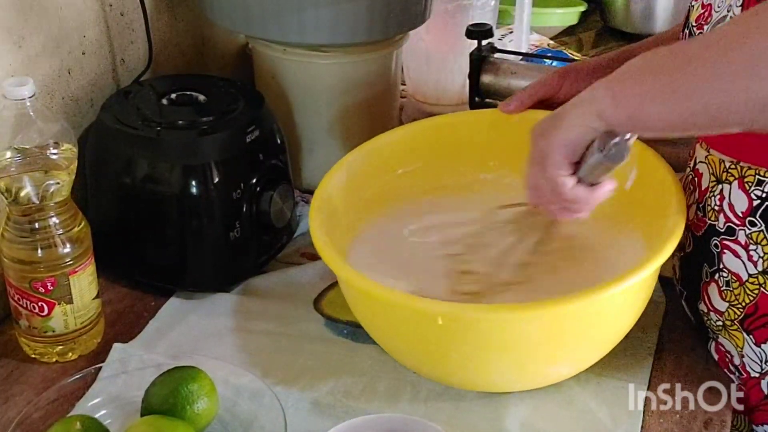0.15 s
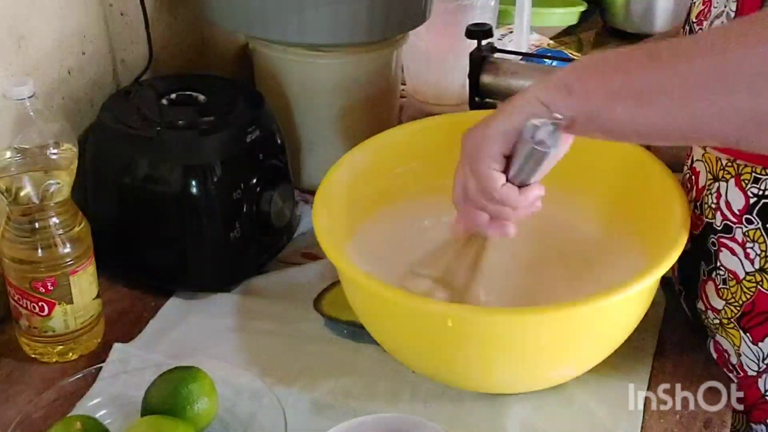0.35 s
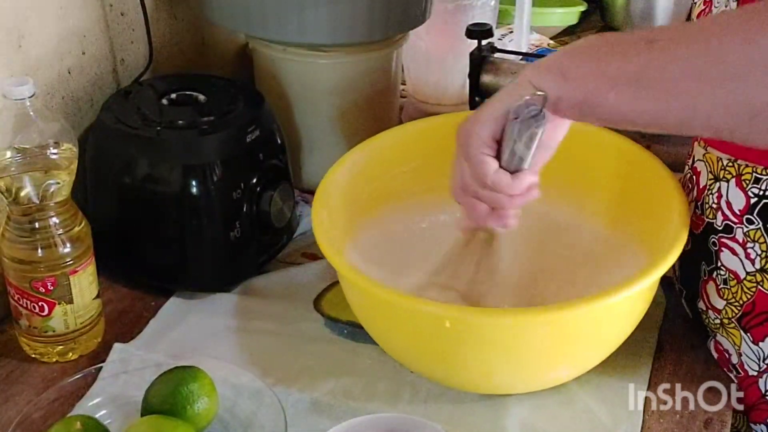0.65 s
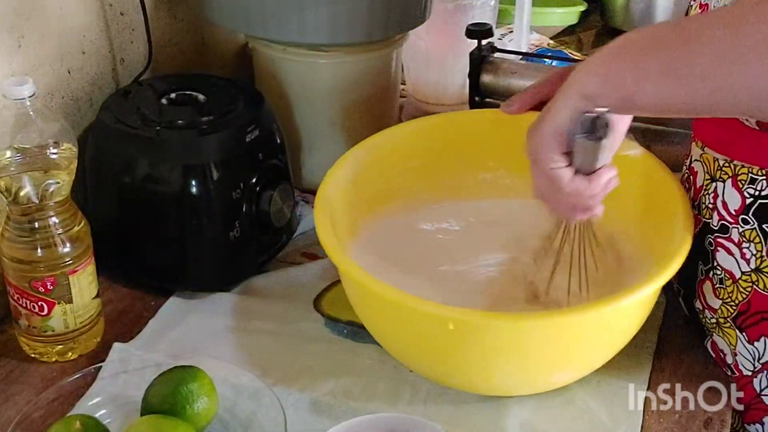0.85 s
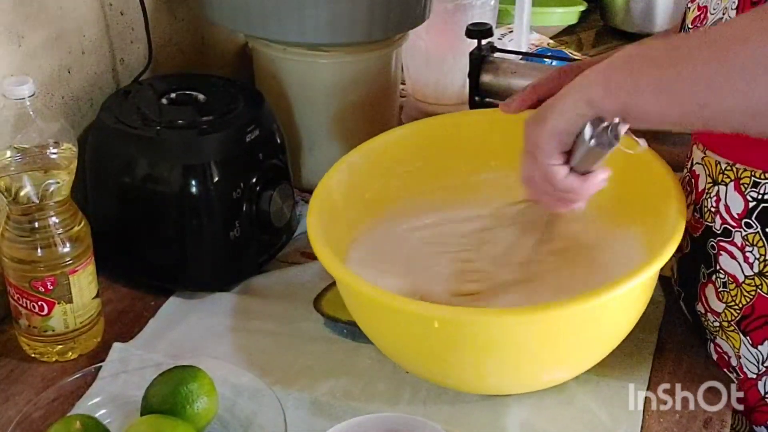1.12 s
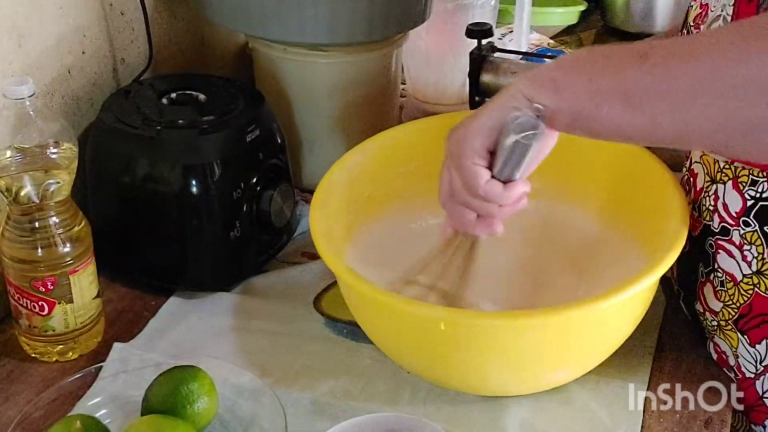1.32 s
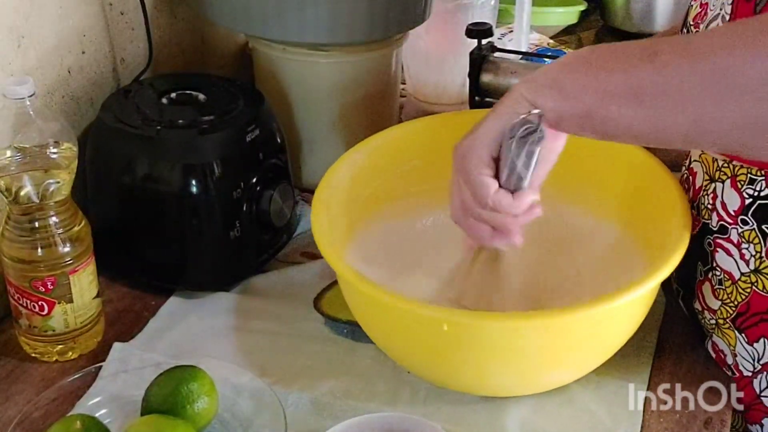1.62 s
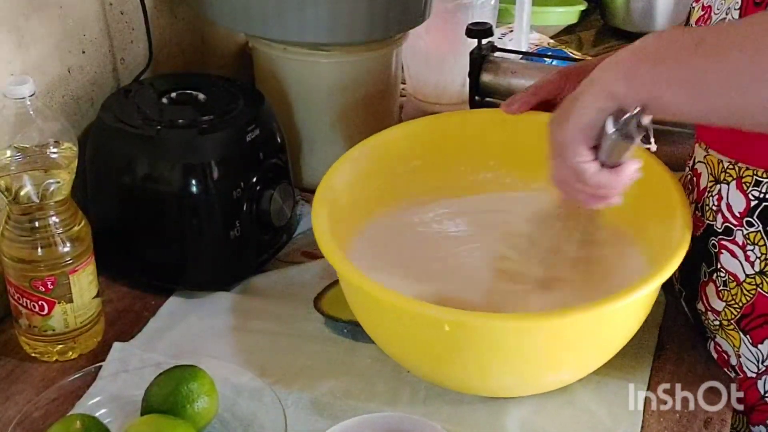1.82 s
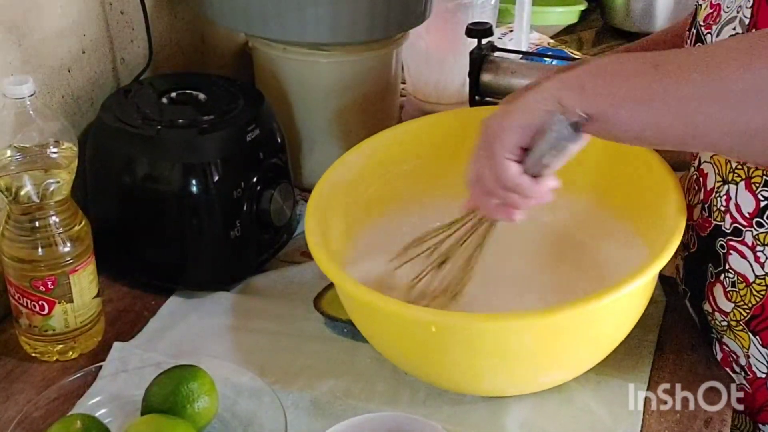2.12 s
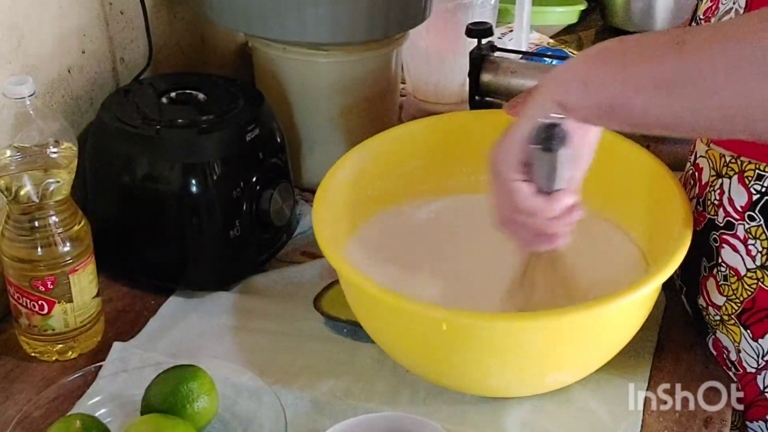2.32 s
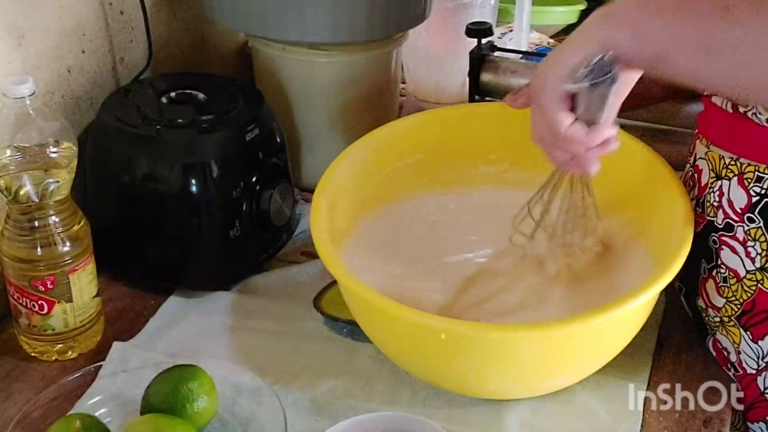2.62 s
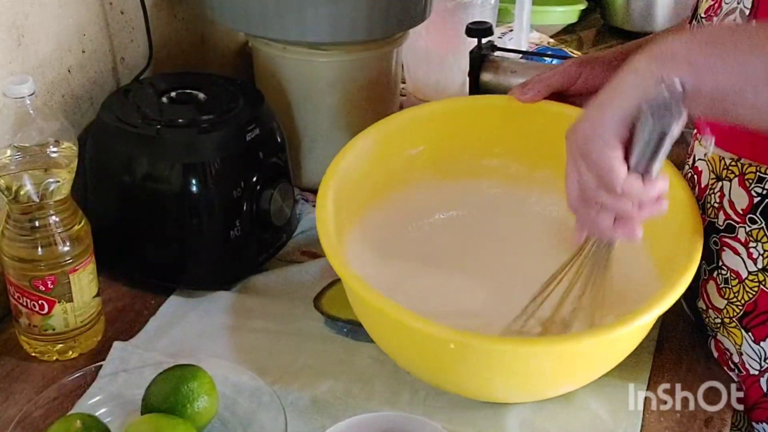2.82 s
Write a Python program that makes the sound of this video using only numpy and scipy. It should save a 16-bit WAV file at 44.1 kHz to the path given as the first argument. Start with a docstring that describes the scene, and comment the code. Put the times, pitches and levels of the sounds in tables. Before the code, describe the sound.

Batter slops and swishes as a wire whisk circles a plastic bowl, ticking against the wall and thudding softly through the table. Two sharper knocks finish it. The stereo microphone is close, in a small kitchen with a low hum.

```python
"""Batter slops in a plastic bowl as a wire whisk beats it, about three turns a second.
We listen in stereo, close to the bowl, in a small kitchen. Air pockets gloop, bubbles fizz and burst,
the wires tick and scrape on the bowl's wall, and strong strokes thud through the table.
After a short rest the whisk knocks the bowl twice.
Under it all lies a low hum, with a louder low drone that swells twice."""
import sys
import numpy as np
from scipy import signal
from scipy.fft import rfft, irfft
from scipy.io import wavfile
from scipy.ndimage import uniform_filter1d

SR = 44100
rng = np.random.default_rng(int(sys.argv[2]) if len(sys.argv) > 2 else 0)


def bounce(signal):
    """Save signal as a 16-bit WAV file at the path given by the first command-line argument."""
    frames = np.transpose(np.atleast_2d(signal))
    limited = np.clip(frames, -1, 1)
    pcm = np.round(limited * 32767).astype(np.int16)
    wavfile.write(sys.argv[1], SR, pcm)


N = 130095

# Folds of batter. Each row: start in seconds, relative level in dB, air-pocket pitch in Hz,
# splash offset in dB, decay in seconds.
FOLDS = [(0.003,-35,195,-21,0.015),(0.118,-34,230,-10.5,0.017),(0.159,-40.5,186,-14,.018),(0.212,-46.5,525,-6,0.012),(0.313,-38.5,480,-9.5,0.019),(0.459,-32.5,230.5,-13.5,0.012),(0.514,-51,319,-18,0.014),(0.644,-37.5,144,-6,0.017),(0.742,-37,200,-13.5,0.018),(0.769,-34,190,-14,0.019),(0.823,-35.5,464,-13.5,0.02),(0.953,-38.5,481,-13.5,0.025),(1.075,-34,174.5,-16,0.024),(1.114,-35.5,234.6,-35,0.022),(1.256,-38,481,-11,0.0099),(1.273,-33,490,-11,.016),(1.401,-40.5,142,-6,0.011),(1.417,-27.5,465,-21,0.0093),(1.425,-37,305,-20,.01),(1.59,-34.5,480,-13,.019),(1.734,-40.5,550,-6.5,0.027),(1.768,-44,320,-7.5,0.02),(1.848,-48,531,-4,0.006),(1.966,-48,207,-5.5,0.013),(2.027,-43,470,-13,.011),(2.115,-40.5,320,-12,0.012),(2.168,-46,300,-2,0.016),(2.227,-37.5,330,-17,0.012),(2.331,-39.5,463,-12,0.024),(2.493,-41.5,227.5,-5.5,0.027),(2.518,-38,305,-15,.016),(2.595,-46.5,507,-18,0.0075)]
# Drag of the wires through the batter. Each row: time in seconds, relative level in dB.
STIRRING = [(0,-56),(.07,-59.5),(.14,-55.5),(.22,-61),(.28,-65),(.35,-58.5),(.46,-59),(.55,-58),(.62,-65.5),(.68,-63),(.72,-71),(.78,-61.5),(.84,-61),(1.0,-60.5),(1.05,-61),(1.1,-58),(1.24,-61),(1.3,-60.5),(1.37,-60.5),(1.42,-53.5),(1.46,-61),(1.52,-60),(1.57,-64),(1.62,-62),(1.69,-59.5),(1.76,-58.5),(1.83,-61.5),(1.91,-65),(2.03,-60),(2.15,-61.5),(2.21,-66),(2.27,-60.5),(2.32,-70),(2.37,-55.5),(2.41,-64.5),(2.445,-53.5),(2.475,-61),(2.51,-59.5),(2.58,-58.5),(2.64,-81),(2.72,-84),(2.82,-88)]
# Spectra of moving batter and of the wires' treble. Each row: frequency in Hz, relative gain in dB.
BATTER_COLOUR = [(60, -25), (130, 0.5), (230, -1.5), (400, -3), (520, -2.5), (640, -12), (820, -14.5),
                 (1100, -20.5), (3000, -41.5)]
WIRE_COLOUR = [(2500, -31), (5000, -2), (6400, -1), (7500, 3), (11000, 0.5), (16000, -9)]
# Likeness of the left and right microphones. Each row: frequency in Hz, correlation (1 is identical).
LIKENESS = [(30, 0.76), (150, 0.93), (350, 0.83), (700, 0.75), (1400, 0), (3000, 0.11), (16000, 0)]


def slops():
    """Batter folds over: a dull push and a splash."""
    # Each row: frequency in Hz, relative gain in dB.
    splash_colour = [(300, -32), (600, -12), (900, -2.5), (1400, 4.5), (1900, -6.5), (2800, -7),
                     (5000, -17.5), (16000, -61)]
    rise_s = 0.0059
    push, splash = np.zeros((2, 2, N))
    for s, db, _, splash_db, decay_s in FOLDS:
        add(push, s, amp(db - 6) * burst(rise_s, decay_s))
        add(splash, s, amp(db + splash_db - 2) * burst(rise_s, decay_s))
    return colour(push, BATTER_COLOUR) + colour(splash, splash_colour)


def pockets():
    """In each slop an air pocket collapses with a short rising gloop; higher ones die sooner."""
    glide_per_s = 1
    out, t = np.zeros((2, N)), np.arange(SR // 5) / SR
    for s, db, hz, _, _ in FOLDS:
        tone = np.sin(2 * np.pi * hz * (t + glide_per_s * t ** 2 / 2))
        peak_s = 0.0099 * (hz / 300) ** -0.58
        envelope = 2 * t / peak_s * np.exp(-t / peak_s)
        add(out, s, amp(db - 5.5) * tone * envelope)
    return out


def ticks():
    """Wires slide, then clatter on the bowl's batter-damped wall, which rings briefly."""
    # Each row: start in seconds, relative level in dB, treble offset in dB.
    strikes = [(0.0034,-44,-8),(0.0323,-43,-27),(0.1165,-50,-21),(0.3187,-40,-6.5),(0.6408,-35.5,-12),(0.6564,-37,-39),(0.8637,-53,-6.5),(0.8959,-50.5,-26),(0.9548,-34,-16),(0.9747,-45,-14),(1.0902,-43.5,-23),(1.2237,-50.5,-18),(1.2811,-36.5,-18.5),(1.5088,-45.5,-15),(1.538,-47.5,-24),(1.6021,-37.5,-29),(1.7374,-42,-19),(2.1156,-47.5,-8.5),(2.4923,-41,-24),(2.596,-41,-15)]
    # Each row: frequency in Hz, relative gain in dB.
    body_colour = [(200, -21), (600, 6.5), (1400, 0.5), (1900, -2), (2600, -1), (3600, -6), (6000, -18.5),
                   (9000, -26.5)]
    # Each row: frequency in Hz, relative level in dB, seconds to fall 60 dB.
    wall_modes = [(1395, -2.5, .05), (2323, 0.5, 0.033), (2685, -11.5, 0.032), (3348, -4.5, 0.033)]
    slide_s, decay_s = 0.014, 0.0041
    wall = ring(wall_modes)[None, :SR // 8]
    body, treble, rings = np.zeros((3, 2, N))
    for s, db, treble_db in strikes:
        add(body, s - slide_s, amp(db - 11.5) * burst(slide_s, decay_s))
        add(body, s, amp(db - 3) * burst(0.002, decay_s))
        add(treble, s, amp(db + treble_db + 1.5) * burst(0.0012, decay_s))
        rung = signal.fftconvolve(burst(0.0007, decay_s, size=1024), wall, axes=1)
        add(rings, s, amp(db - 18) * rung / np.std(rung[:, :SR // 50]))
    return colour(body, body_colour) + colour(treble, WIRE_COLOUR) + rings


def knocks():
    """The whisk hits the bare plastic, which rings while the wires rattle."""
    # Each row: start in seconds, relative levels of blow and rattle in dB, rattle delay in seconds.
    hits = [(2.8312, -29.5, -49.5, .006), (2.9358, -27.5, -41, .001)]
    # Each row: frequency in Hz, relative gain in dB.
    blow_colour = [(70, -17), (200, -3), (500, 3), (750, -3), (1400, 1.5), (1900, -10.5), (2700, -9),
                   (4500, -16.5), (6000, -25), (16000, -43)]
    # Each row: frequency in Hz, relative level in dB, seconds to fall 60 dB.
    bowl_modes = [(243, -4.5, 0.21), (307, -8, 0.11), (494, 0, 0.087), (609, -13, .12), (932, -8, 0.34),
                  (1190, -13, 0.2), (1414, -2, 0.13), (2310, -13, .12)]
    blow, rings, rattle = np.zeros((3, 2, N))
    for s, db, rattle_db, delay_s in hits:
        add(blow, s, amp(db) * burst(rise_s=0.0012, decay_s=0.016))
        add(rings, s, amp(db - 6.5) * ring(bowl_modes))
        add(rattle, s + delay_s, amp(rattle_db) * burst(rise_s=0.0009, decay_s=0.019))
    return colour(blow, blow_colour) + rings + colour(rattle, WIRE_COLOUR)


def stirring():
    """Wires drag through the batter, driving a wet swish, the fizz of small bubbles and a low churn."""
    # Each row: frequency in Hz, relative gain in dB.
    swish_colour = [(400, -6), (800, 5), (1100, -12.5), (1450, 2), (1800, -1.5), (2600, -1.5), (4500, -7.5),
                    (6300, -18), (16000, -40)]
    fizz_colour = [(3000, -31), (5000, 1), (6400, -5), (7400, 1), (10000, -3.5), (13000, -9.5),
                   (16000, -22.5)]
    # Each row: time in seconds, relative level in dB.
    fizz_levels = [(0,-66),(.21,-66.5),(.29,-77),(.35,-69),(0.539,-69.5),(.62,-75),(.68,-68),(0.729,-73),(.775,-68),(.81,-80),(.87,-66),(.93,-73),(1.0,-66.5),(1.13,-72.5),(1.2,-64.5),(1.26,-73),(1.41,-65.5),(1.46,-72.5),(1.53,-68),(1.58,-78),(1.63,-69),(1.76,-69.5),(1.84,-69),(1.92,-78.5),(2.05,-67),(2.125,-74),(2.2,-72.5),(2.27,-72.5),(2.411,-71.5),(2.44,-64),(2.47,-81),(2.5,-67.5),(2.61,-72),(2.68,-81),(2.8,-110)]
    t = np.arange(N) / SR
    stir_db = np.interp(t, *np.transpose(STIRRING))
    fizz_db = np.interp(t, *np.transpose(fizz_levels))
    effort_db = stir_db + 63
    swish = colour(grains() * amp(stir_db + 0.5), swish_colour)
    fizz = colour(grains() * amp(fizz_db + 1.5), fizz_colour)
    churn = colour(grains() * amp(0.5 * effort_db - 57), BATTER_COLOUR)
    return swish + fizz + churn


def grains(per_s=3500, spread_db=2.5):
    """Dense tiny pops of uneven size."""
    sizes = amp(spread_db * np.minimum(rng.exponential(1, N), 4))
    popping = rng.random(N) < per_s / SR
    return unit_rms(spread(sizes * popping * rng.standard_normal((2, N))))


def bubbles(small_per_s=160, low_hz=598, high_hz=4590):
    """A few larger bubbles burst among small random ones, which grow louder with the stirring."""
    # Each row: start in seconds, pitch in Hz, relative level in dB.
    large_bubbles = [(.119,900,-42),(.822,850,-37),(0.828,1315,-45),(0.896,1404,-43),(.927,1420,-41.5),(1.09,1144,-40),(1.15,1420,-44),(1.224,1340,-43.5),(1.278,1406,-42),(1.411,1200,-48),(1.415,806,-34),(1.54,1410,-45),(2.116,1795,-42.5),(2.118,970,-40.5),(2.229,764,-40.5),(2.505,1125,-41)]
    out = np.zeros((2, N))
    for s, hz, db in large_bubbles:
        add(out, s, amp(db) * ping(hz, decay_s=0.0052))
    for when, pitch, size in rng.random((round(small_per_s * N / SR), 3)):
        s = when * N / SR
        hz = low_hz * (high_hz / low_hz) ** pitch
        db = np.interp(s, *np.transpose(STIRRING)) + 0.5 + 9.5 * size ** 2
        add(out, s, amp(db) * ping(hz, decay_s=7.6 / hz))
    return out


def ping(hz, decay_s, glide_per_s=1.37):
    """One bubble opens with a short rising tone, its phase differing between the microphones."""
    t = np.arange(SR // 16) / SR
    phase = 2 * np.pi * hz * (t + glide_per_s * t ** 2 / 2)
    lag = (2 * rng.random() - 1) * np.arccos(at_hz(LIKENESS, hz))
    return np.sin([phase + lag, phase - lag]) * np.minimum(t / 0.00096, 1) * np.exp(-t / decay_s)


def scrapes():
    """A wire slips finely along the bowl's wall, each scrape in its own band."""
    # Each row: middle and half length in seconds, relative level in dB, centre in Hz,
    # half width in octaves.
    slips = [(2.06,.022,-68,9400,.15),(2.12,0.015,-66,9600,0.16),(2.44,0.012,-60,5500,.5),(2.43,0.02,-60.5,2650,.12),(1.77,.04,-72,7400,.12)]
    out, t = np.zeros((2, N)), np.arange(-4096, 4096) / SR
    hz = np.fft.rfftfreq(len(t), 1 / SR) + 1
    for s, half_s, db, centre_hz, octaves in slips:
        band = np.exp(-0.5 * (np.log2(hz / centre_hz) / octaves) ** 2)
        hiss = unit_rms(irfft(rfft(noise(len(t))) * band))
        add(out, s + t[0], amp(db) * hiss * np.exp(-0.5 * (t / half_s) ** 2))
    return out


def shoves(rise_s=0.011):
    """Strong strokes shove the bowl against the table, which gives a soft low thud."""
    # Each row: start in seconds, relative level in dB.
    strokes = [(0.134,-39),(.2,-47),(.31,-40),(0.461,-41),(0.634,-38.5),(.755,-47),(0.826,-47),(1.265,-47),(1.32,-44),(1.40,-40.5),(2.234,-41),(2.51,-50)]
    # Each row: frequency in Hz, relative level in dB, seconds to fall 60 dB.
    table_modes = [(57.3, -1.5, 0.3), (90.6, 1, .3), (135.4, 0.5, 0.22)]
    out, thud = np.zeros((2, N)), ring(table_modes)
    thud *= np.minimum(np.arange(len(thud)) / SR / rise_s, 1)
    for s, db in strokes:
        add(out, s, amp(db) * thud)
    return out


def drone(fade_s=0.027):
    """A low tone near 80 Hz swells twice, unsteady in pitch and level."""
    # One list per swell. Each row: time in seconds, pitch in Hz, relative level in dB.
    swells = [
        [(0.93, 84.7, -43), (0.972, 80.3, -45), (1.02, 83.6, -37.5), (1.098, 81.4, -45.5), (1.216, 81, -38.5),
         (1.27, 80.2, -52)],
        [(1.89, 80.1, -58), (1.922, 79.9, -42.5), (2.006, 80.5, -36.5), (2.056, 82.3, -48.5), (2.132, 81, -36),
         (2.24, 78, -51)],
    ]
    out, t = np.zeros(N), np.arange(N) / SR
    for swell in swells:
        s, hz, db = np.transpose(swell)
        fade = np.clip(np.minimum(t - s[0], s[-1] - t) / fade_s, 0, 1)
        phase = 2 * np.pi * np.cumsum(np.interp(t, s, hz)) / SR
        out += fade * amp(np.interp(t, s, db) + 1.5) * np.sqrt(2) * np.sin(phase)
    return out


def hum(waver_depth=0.26):
    """Room tone: low wavering tones over a steady rumble."""
    # Each row: frequency in Hz, relative level in dB.
    tones = [(59.2, -54), (81, -60), (91, -62.5), (137, -66)]
    rumble_colour = [(20, -51.5), (30, -19), (39, 6.5), (60, -2), (90, 1), (130, -12), (200, -19),
                     (500, -21.5), (1300, -22.5), (2200, -40.5), (4500, -35.5), (6000, -44.5), (16000, -42)]
    t = np.arange(N) / SR
    out = amp(-52.5) * colour(noise(N), rumble_colour)
    for hz, db in tones:
        waver = sum(np.cos(2 * np.pi * (rng.uniform(-3, 5.5) * t + rng.random())) for _ in range(12))
        tone = np.sqrt(2) * np.sin(2 * np.pi * (hz * t + rng.random()))
        out += amp(db) * (1 + waver_depth * unit_rms(waver)) * tone
    return out


def kitchen(x):
    """Direct sound, quick reflections off near walls and a short tail, plus low standing waves."""
    # Each row: frequency in Hz, seconds to fall 60 dB.
    reverb_times = [(100, 0.25), (400, 0.44), (1500, 0.45), (5000, 0.36), (15000, 0.26)]
    # Each row: frequency in Hz, relative level in dB, seconds to fall 60 dB.
    room_modes = [(137.6, 5.5, 0.2), (200, -13.5, 0.067), (234, 1.5, 0.19), (310.7, -5, 0.41),
                  (359.7, 3.5, 0.12), (484, -7, 0.089)]
    size, build_s = SR // 2, 0.0072
    hz, t, bands = signal.stft(noise(size), SR, nperseg=256)
    decay = amp(-60 * t / at_hz(reverb_times, hz)[:, None])
    tail = signal.istft(bands * decay, SR, nperseg=256)[1][:, :size]
    tail *= np.minimum(np.arange(size) / SR / build_s, 1)
    response = amp(-5.5) * tail / np.linalg.norm(tail[0])
    early = burst(rise_s=0.0015, decay_s=0.0062)
    add(response, 0, amp(-6.5) * early / np.linalg.norm(early[0]))
    response[:, 0] += 1  # straight from bowl to microphones
    # Keep the room neutral in broad colour.
    spectrum = np.fft.fft(response)
    power = uniform_filter1d(abs(spectrum) ** 2, size=60, axis=1, mode="wrap")
    response = np.fft.ifft(spectrum * minimum_phase(-0.5 * np.log(power / power.mean()))).real
    return signal.fftconvolve(x, response + amp(-51.5) * ring(room_modes), axes=1)[:, :N]


def amp(db):
    """Decibels to gain."""
    return 10 ** (np.asarray(db) / 20)


def unit_rms(x):
    """Scales to rms 1."""
    return x / np.sqrt(np.mean(x ** 2) + 1e-20)


def at_hz(points, hz):
    """Reads a table on a log-frequency axis."""
    f, value = np.transpose(points)
    return np.interp(np.log(hz + 1), np.log(f + 1), value)


def add(mix, s, sound):
    """Mixes a sound in at s seconds, or at zero if s is negative."""
    part = mix[:, max(round(s * SR), 0):][:, :sound.shape[-1]]
    part += sound[..., :part.shape[1]]


def minimum_phase(log_gain):
    """Spectrum of the causal filter with this natural-log gain."""
    return np.exp(np.conj(signal.hilbert(log_gain)))


def colour(x, points, size=4096):
    """Applies a causal filter of unit energy with the given spectral shape."""
    gain = amp(at_hz(points, abs(np.fft.fftfreq(size, 1 / SR))))
    taps = np.fft.ifft(minimum_phase(np.log(gain))).real[:size // 2]
    return signal.oaconvolve(x, taps[None] / np.linalg.norm(taps), axes=1)[:, :N]


def spread(x):
    """Makes two unrelated channels alike in the bass, as at a pair of microphones."""
    spectra = rfft(x)
    same = at_hz(LIKENESS, np.fft.rfftfreq(x.shape[1], 1 / SR))
    mid = spectra[0] * np.sqrt((1 + same) / 2)
    side = spectra[1] * np.sqrt((1 - same) / 2)
    return irfft(np.array([mid + side, mid - side]), x.shape[1])


def noise(size):
    """Stereo noise with a flat spectrum."""
    spectra = np.exp(2j * np.pi * rng.random((2, size // 2 + 1)))
    return unit_rms(spread(irfft(spectra, size)))


def burst(rise_s, decay_s, size=8192):
    """A puff of noise that rises and dies away."""
    t = np.arange(size) / SR
    return noise(size) * np.minimum(t / rise_s, 1) * np.exp(-np.maximum(t - rise_s, 0) / decay_s)


def ring(modes):
    """Dying sines of a mode table."""
    t = np.arange(SR // 2) / SR
    return sum(amp(db - 60 * t / t60) * np.sin(2 * np.pi * hz * t) for hz, db, t60 in modes)


def scene():
    """The bowl in the kitchen, over the hum and the drone."""
    gloops = pockets()
    room_share = amp(-7)  # the gloops are heard mostly dry and close
    bowl = slops() + ticks() + knocks() + stirring() + bubbles() + scrapes()
    direct = hum() + drone() + shoves() + (1 - room_share) * gloops
    return direct + kitchen(bowl + room_share * gloops)


def record(dry):
    """The stereo microphones: slightly uneven left to right, with the highest treble cut off."""
    # Each row: frequency in Hz, left minus right in dB.
    balance = [(60, 1.5), (180, 0.5), (700, 0.5), (1400, 0.1), (3000, 1), (5500, -1), (9000, 0.5),
               (14000, 5.5)]
    tilt_db = at_hz(balance, np.fft.rfftfreq(N, 1 / SR)) / 2
    heard = irfft(rfft(dry) * amp([tilt_db, -tilt_db]), N)
    lowpass = signal.firwin(511, cutoff=15900, window=("kaiser", 9), fs=SR)
    return signal.oaconvolve(heard, lowpass[None], "same")


dry = scene()
out = record(dry)
bounce(out)
```